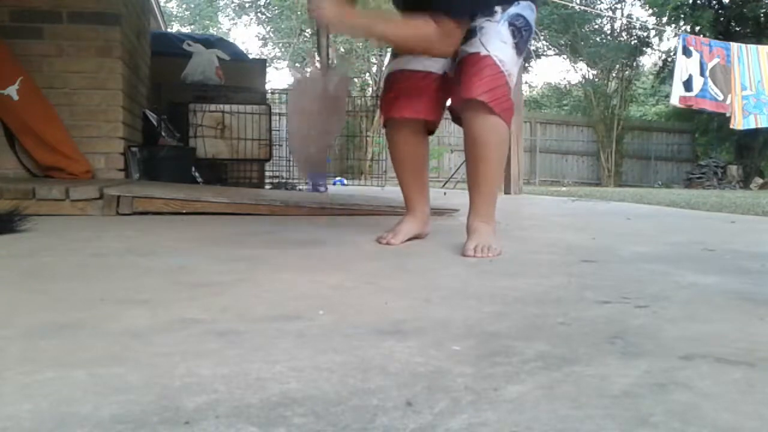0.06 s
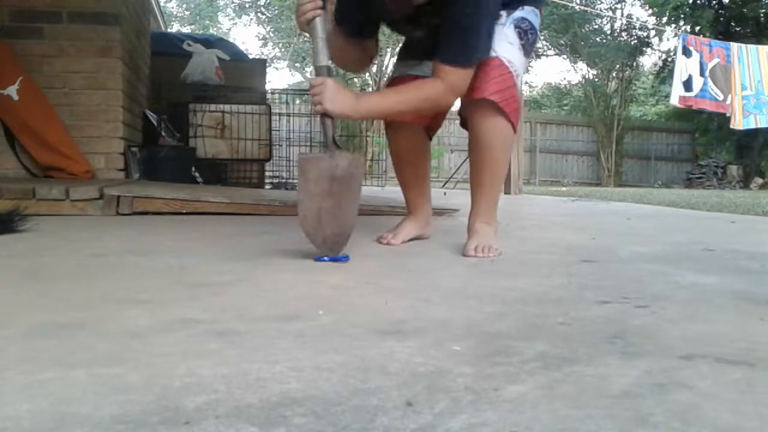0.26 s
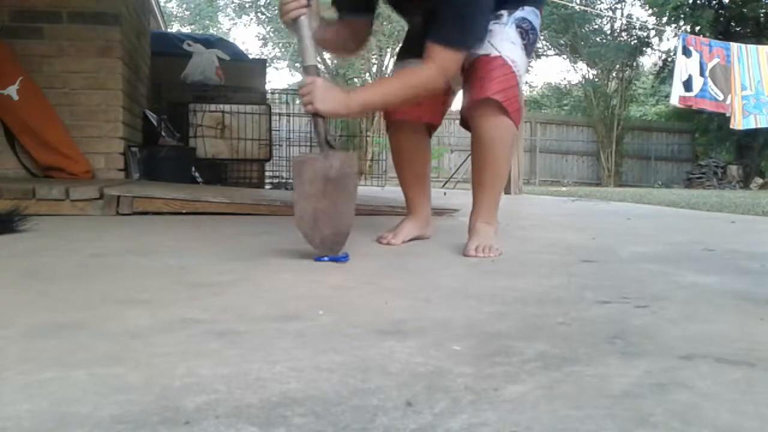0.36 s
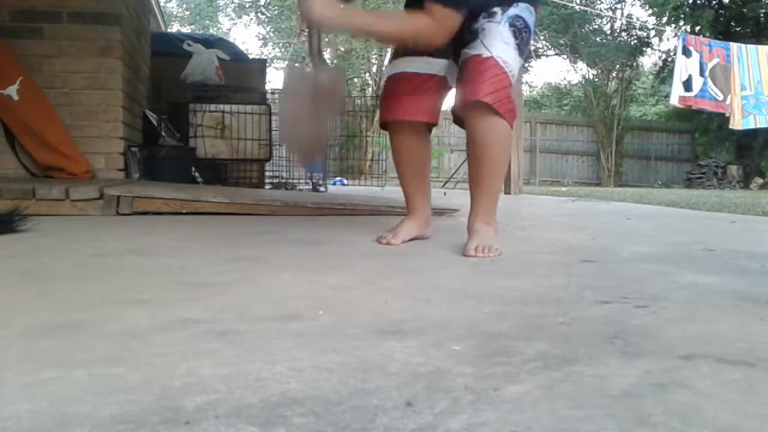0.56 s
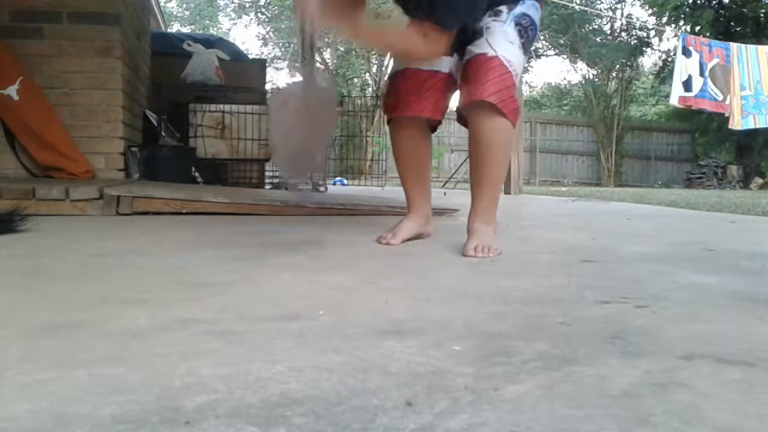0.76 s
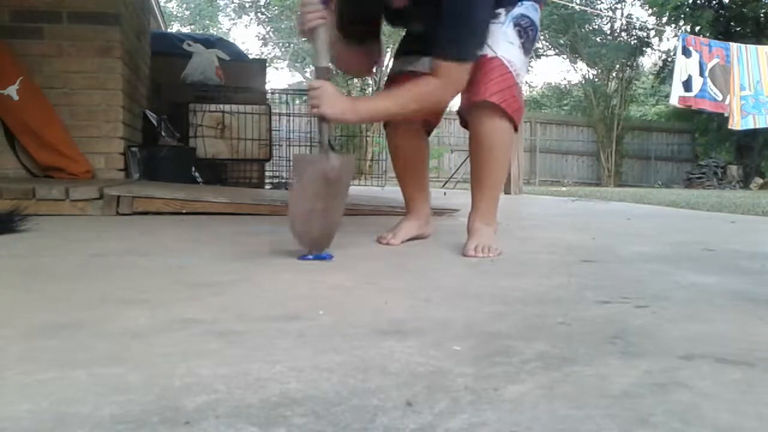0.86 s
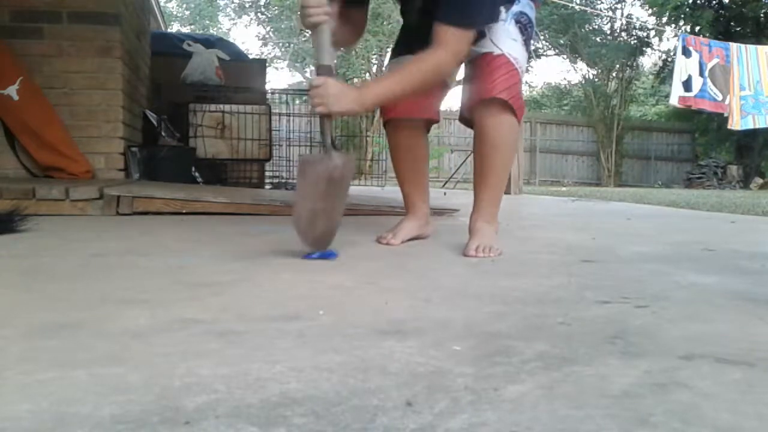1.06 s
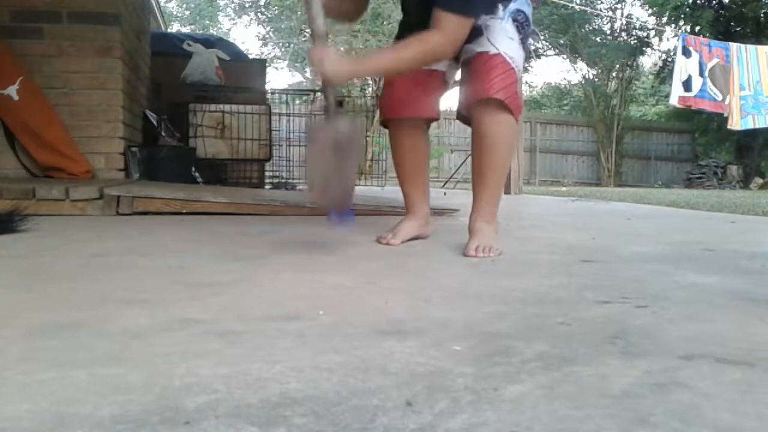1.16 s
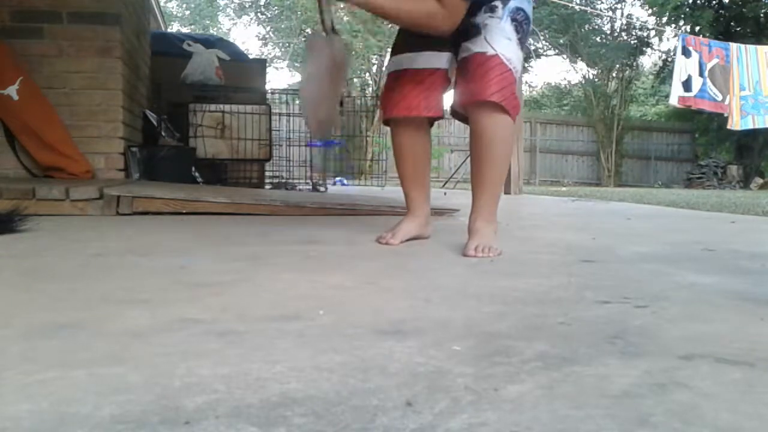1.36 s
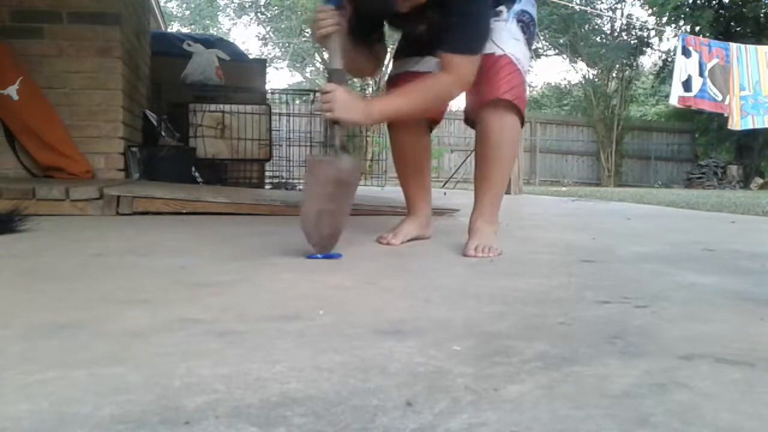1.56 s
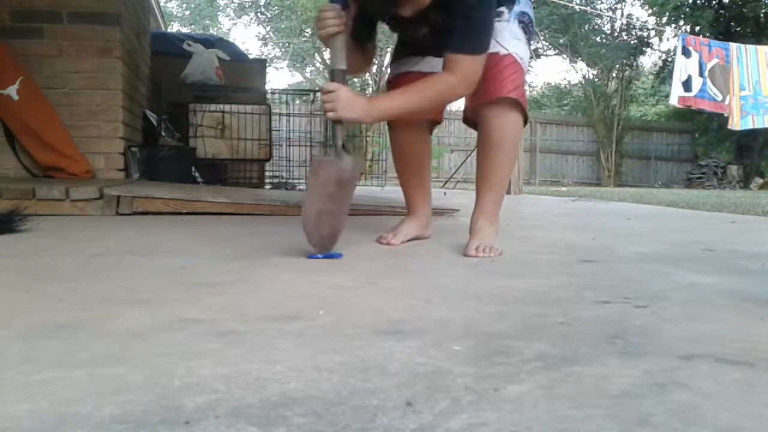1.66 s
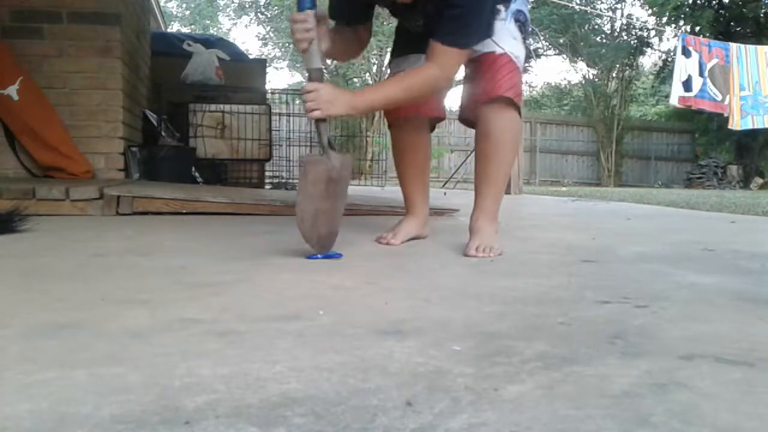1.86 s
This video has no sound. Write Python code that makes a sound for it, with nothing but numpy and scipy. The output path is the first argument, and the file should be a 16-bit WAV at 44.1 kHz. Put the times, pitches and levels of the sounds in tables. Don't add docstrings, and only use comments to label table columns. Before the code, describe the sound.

A steel shovel blade slams a small plastic toy on concrete three times, ringing over cicadas

```python
import sys
import numpy as np
from scipy import signal
from scipy.fft import rfft, irfft, next_fast_len
from scipy.io import wavfile
from scipy.ndimage import map_coordinates

SR = 44100
rng = np.random.default_rng(int(sys.argv[2]) if len(sys.argv) > 2 else 0)


def wav_out(sig):
    wavfile.write(sys.argv[1], SR, np.round(np.clip(np.atleast_2d(sig).T, -1, 1) * 32767).astype(np.int16))


def to_linear_factor(level_db):
    exponent = np.asarray(level_db, float) / 20
    return 10 ** exponent


N = 83790

# t/s, level/dB, tilt/(dB per octave), wall echo/dB
BLOWS = [
    (0.209, -13, -1, -21),
    (.8780, -13, 0.5, -4),
    (1.5709, -11, -0.5, -25.5),
]


def unit(x):
    return x / np.sqrt(np.mean(x ** 2) + 1e-20)


def noise(n):
    return rng.standard_normal(n)


def along(points, hz):
    f, v = np.transpose(points)
    return np.interp(np.log(hz + 1), np.log(f + 1), v)


def filtered(x, response):
    n = x.shape[-1]
    m = next_fast_len(n + SR // 4)
    return irfft(rfft(x, m) * response(np.fft.rfftfreq(m, 1 / SR)), m)[..., :n]


def peak(hz, width_hz):
    return lambda f: 1j * f * width_hz / (hz * hz - f * f + 1j * f * width_hz)


def wobble(rate_hz, size=N):
    knots = noise(int(size * rate_hz / SR) + 4)
    return map_coordinates(knots, [np.arange(size) * rate_hz / SR])


def decay(t, t60_s, db=0):
    return to_linear_factor(db - 60 * t / t60_s)


def rise(t, tau_s):
    return 1 - np.exp(-t / tau_s)


def sine(hz, t):
    return np.sin(2 * np.pi * hz * t)


def add(out, s, x):
    part = out[round(s * SR):][:len(x)]
    part += x[:len(part)]


def far_wash():
    # f/Hz, density/(dB per Hz)
    wash_bands = [(15, -68.5), (25, -30.5), (109, -3), (209, -10), (242, -6), (392, -11), (1030, -15),
                  (1250, -18), (8000, -35), (10400, -70.5), (17600, -120)]
    wash = unit(filtered(noise(N), lambda f: to_linear_factor(along(wash_bands, f))))
    return wash * to_linear_factor(-54 + 0.4 * wobble(6.5))


def machine_hum():
    # f/Hz, width/Hz, level/dB
    hum_tones = [(120, 12, -63), (176, 7.2, -64), (239.8, 2.7, -62.5)]
    return sum(to_linear_factor(db) * unit(filtered(noise(N), peak(hz, width_hz))) for hz, width_hz, db in hum_tones)


def air_hiss():
    return to_linear_factor(-69) * unit(filtered(noise(N), lambda f: peak(13500, 6000)(f) ** 2 * (f > 11500)))


def cloth_swish():
    centre_s, spread_s = 0.115, 0.045
    t = np.arange(N) / SR
    colour = lambda f: peak(2350, 1800)(f) ** 2 + 0.068 * peak(5000, 4000)(f)
    swell = np.exp(-0.5 * ((t - centre_s) / spread_s) ** 2)
    return to_linear_factor(-59) * unit(filtered(noise(N), colour)) * swell


def cicadas():
    buzz_hz, buzz_depth = 69.7, 0.35
    # f/Hz, width/Hz, level/dB
    cicada_bands = [(9250, 500, -10), (9660, 280, 3.5), (10220, 400, -2)]

    def body(f):
        bands = sum(to_linear_factor(db) * abs(peak(hz, w)(f) * peak(hz, 2 * w)(f)) for hz, w, db in cicada_bands)
        return bands / (1 + (f / 10750) ** 60)

    cycles = buzz_hz * np.arange(N) / SR + 0.08 * wobble(4)
    buzz = 1 + buzz_depth * np.sin(2 * np.pi * cycles)
    return to_linear_factor(-57 + 0.8 * wobble(17)) * unit(filtered(buzz * noise(N), body))


def toy_ticks():
    # t/s, level/dB
    ticks = [
        (0.472, -57),
    ]
    out = np.zeros(N)
    t = np.arange(int(0.5 * SR)) / SR
    for s, db in ticks:
        burst = filtered(noise(len(t)), peak(3000, 6000)) * decay(t, 0.048)
        ping = sine(1200, t) * decay(t, 0.05, 1)
        add(out, s, to_linear_factor(db) * (burst + ping))
    return out


def dying(colour, n):
    # f/Hz, t60/s
    patio_decay = [(70, 0.33), (200, 0.27), (1000, 0.23), (4000, 0.26), (12000, .21)]
    t = np.arange(n) / SR
    dense = unit(filtered(noise(n), colour))
    hz, t60_s = np.transpose(patio_decay)
    out = np.zeros(n)
    for k in range(len(hz)):
        share = np.c_[hz, np.arange(len(hz)) == k]
        out += filtered(dense, lambda f: along(share, f)) * decay(t, t60_s[k])
    return out


def strike_colour(tilt_db):
    # f/Hz, density/(dB per Hz)
    clatter_bands = [(40, -61), (70, -34.5), (165, -8.5), (450, -13), (1000, -3.5), (3000, -9.5),
                     (4200, -12), (16000, -13.5)]
    return lambda f: to_linear_factor(along(clatter_bands, f) + tilt_db * np.log2((f + 50) / 2000))


def clatter(colour, wall_db, t):
    wall_s, wall_rise_s = 0.022, 0.002
    wall = to_linear_factor(wall_db) * rise(np.maximum(t - wall_s, 0), wall_rise_s)
    return (rise(t, 0.00067) + wall) * dying(colour, len(t))


def fence(colour, t):
    far = unit(filtered(noise(len(t)), lambda f: colour(f) / (1 + (f / 5000) ** 2)))
    return far * decay(t, 0.65, -25) * rise(t, 0.033)


def boom(t):
    # f/Hz, t60/s, level/dB
    room_modes = [(82.6, 0.32, -24.5), (162.4, 0.33, -15), (221.7, 0.11, -10.5), (264.1, 0.18, -12.5)]
    return sum(decay(t, t60_s, db) * sine(hz, t) for hz, t60_s, db in room_modes) * rise(t, 0.006)


def shiver(t):
    u = t * 454
    return np.sin(2 * np.pi * u) * u * np.exp(-u * u / 2) * to_linear_factor(-6.5)


def crack(t):
    return unit(filtered(noise(len(t)), peak(8400, 7200))) * decay(t, 0.014, 2)


def knock(k, t):
    # lag/s, level/dB, f/Hz, length/s
    toy_knocks = [
        (.0017, 12, 1050, 0.00053),
        (.0026, 7, 1710, 0.00092),
        (.0016, 13, 1243, 0.00054),
    ]
    lag_s, db, hz, length_s = toy_knocks[k]
    u = t - lag_s
    return -np.cos(2 * np.pi * hz * u) * np.exp(-(u / length_s) ** 2) * to_linear_factor(db)


def fine_ring(hz, colour, t):
    n = len(hz)
    level = colour(hz) * np.sqrt(hz / 1000) * to_linear_factor(-19 + 3.5 * noise(n))
    t60_s = 0.22 * np.exp(0.06 * noise(n))
    tones = np.sin(2 * np.pi * (np.outer(hz, t) + rng.random((n, 1))))
    return rise(t, 0.0022) * (level @ (tones * decay(t, t60_s[:, None])))


def blade_ring(k, t):
    waver_rad = 0.7
    # f/Hz, t60/s, level/dB at blows 1, 2, 3
    blade_modes = [(669, .2, -10, -15.5, -9), (753, 0.081, -14.5, -4, -13), (975, 0.3, -4.5, -6.5, -10.5),
                   (1160, 0.3, -8.5, -21, -13.5), (1239, .25, -5, -16.5, -4.5),
                   (1460, 0.14, -13.5, -12, -19.5), (1742, 0.16, -2, -7.5, -5),
                   (2034, .2, -11.5, -3.5, -1.5), (2694, 0.23, -13.5, -16.5, -10),
                   (2943, 0.24, -10, -13.5, -8.5), (3546, 0.28, -16, -12.5, -42),
                   (6320, 0.1, -23, -14, -44), (5060, .22, -19, -11, -18.5),
                   (8440, 0.19, -13, -10.5, -13.5)]
    n = len(t)
    ring = np.zeros(n)
    for hz, t60_s, *blow_db in blade_modes:
        phase = 2 * np.pi * (hz * t + rng.random()) + waver_rad * wobble(30, size=n)
        ring += decay(t, t60_s, blow_db[k]) * np.sin(phase)
    ring *= rise(t, 0.001)
    echo = dying(np.ones_like, n)
    wet = signal.fftconvolve(ring * decay(t, 0.18), echo / np.linalg.norm(echo))[:n]
    return to_linear_factor(-2) * (ring + to_linear_factor(-2) * wet)


def shovel():
    shiver_lead_s = 0.0025
    out = np.zeros(N)
    t = np.arange(int(0.5 * SR)) / SR
    fine_hz = np.exp(rng.uniform(np.log(500), np.log(10500), size=110))
    for k, (s, db, tilt_db, wall_db) in enumerate(BLOWS):
        colour = strike_colour(tilt_db)
        patio = clatter(colour, wall_db, t) + fence(colour, t) + boom(t)
        impact = crack(t) + knock(k, t)
        blade = fine_ring(fine_hz, colour, t) + blade_ring(k, t)
        add(out, s, to_linear_factor(db) * (patio + impact + blade))
        add(out, s - shiver_lead_s, to_linear_factor(db) * shiver(t))
    return out


def scene():
    background = far_wash() + machine_hum() + air_hiss() + cicadas()
    highpass = lambda f: (1j * f / (55 + 1j * f)) ** 2
    strikes = to_linear_factor(7.5) * filtered(shovel() + toy_ticks(), highpass)
    return (background + cloth_swish() + strikes)[None]


def causal(points):
    cep = irfft(np.log(to_linear_factor(along(points, np.fft.rfftfreq(8192, 1 / SR)))))
    cep[1:4096] *= 2
    cep[4097:] = 0
    return irfft(np.exp(rfft(cep)))[:4096]


def band_limit(x):
    return signal.sosfilt(signal.butter(12, 17020, fs=SR, output="sos"), x)


def record(dry):
    top_hz, attack_top_hz, attack_s = 15750, 16950, 0.006
    # f/Hz, level/dB
    mic_points = [(200, 0.5), (6000, -0.5), (9000, 3.5), (10300, -1.5), (11800, -13.5), (14000, -4),
                  (15500, -9.5)]
    # t/s, level/dB
    gain_points = [
        (0, -0.5),
        (0.168, 0),
        (0.204, -8),
        (0.849, -7),
        (0.875, -10),
        (1.541, -10),
        (1.568, -11.5),
        (1.9, -10),
    ]
    t = np.arange(N) / SR
    gain = to_linear_factor(np.interp(t, *np.transpose(gain_points)))
    x = signal.fftconvolve(dry, causal(mic_points)[None])[:, :N] * gain
    below = lambda hz: filtered(x, lambda f: 0.5 - 0.5 * np.tanh((f - hz) / 60))
    attack = sum(np.exp(-((t - blow[0] - 0.002) / attack_s) ** 4) for blow in BLOWS)
    low = below(top_hz)
    mix = low + 0.4 * attack * (below(attack_top_hz) - low)
    limited = mix / (1 + np.abs(mix / 0.95) ** 8) ** (1 / 8)
    return band_limit(limited)


dry = scene()
out = record(dry)
wav_out(out)
```